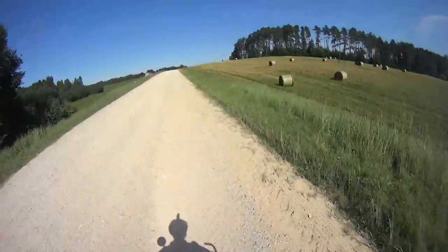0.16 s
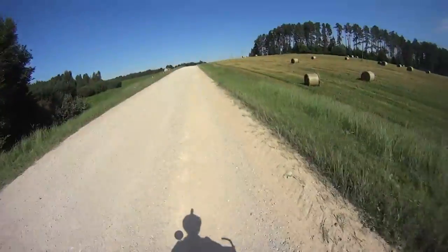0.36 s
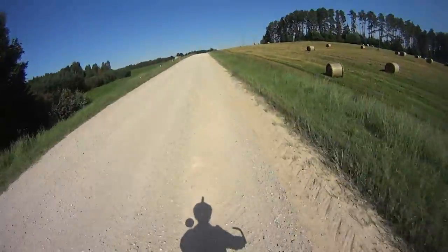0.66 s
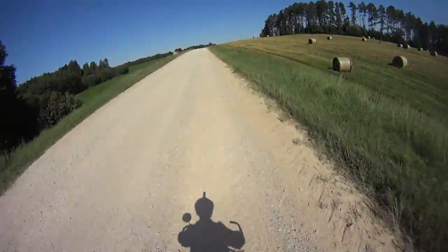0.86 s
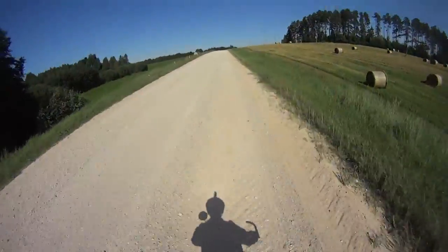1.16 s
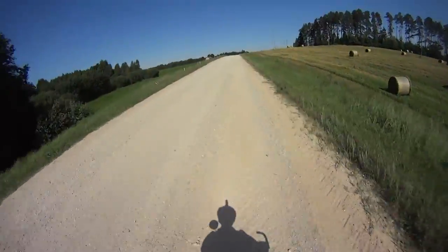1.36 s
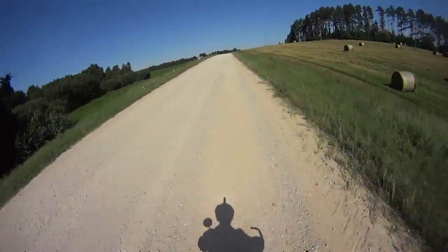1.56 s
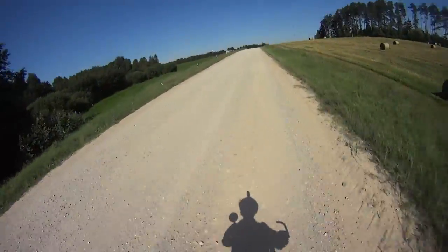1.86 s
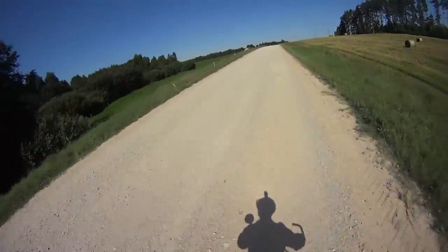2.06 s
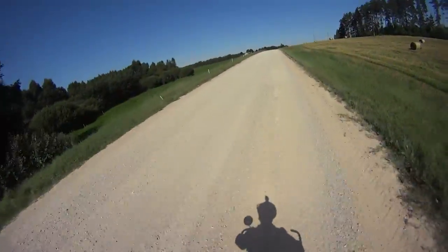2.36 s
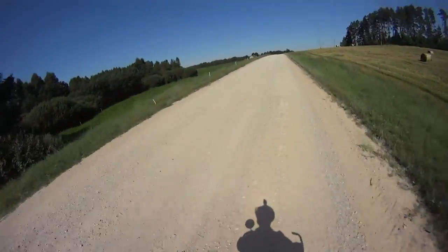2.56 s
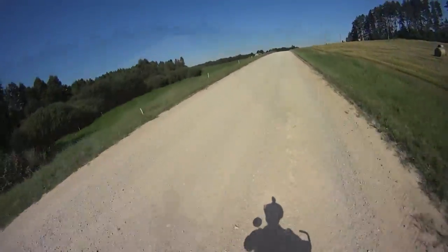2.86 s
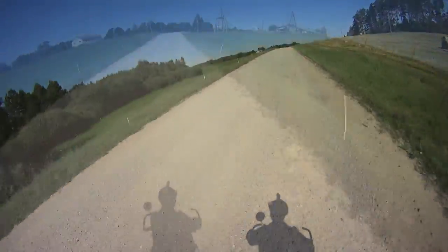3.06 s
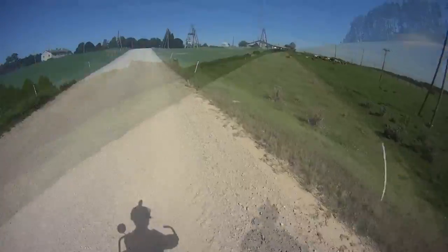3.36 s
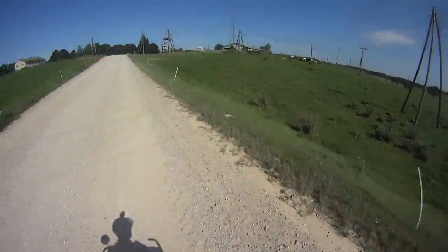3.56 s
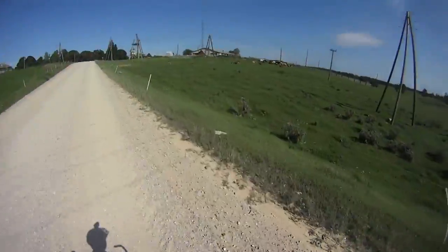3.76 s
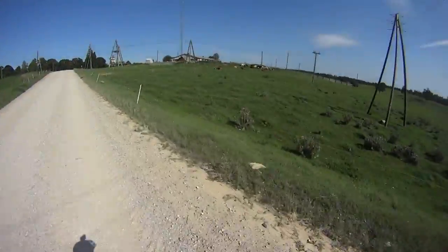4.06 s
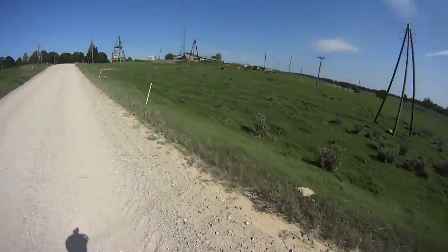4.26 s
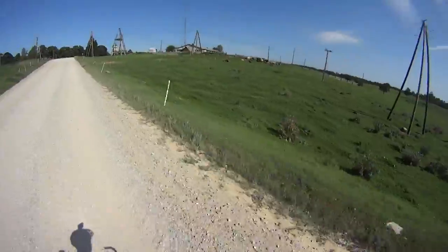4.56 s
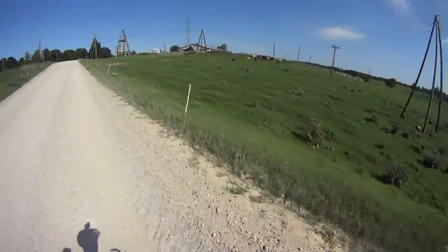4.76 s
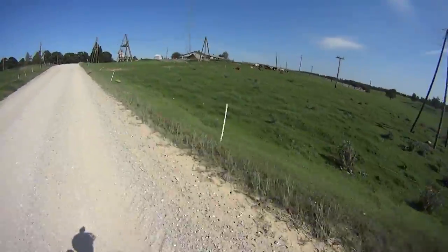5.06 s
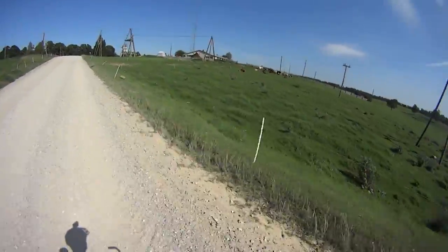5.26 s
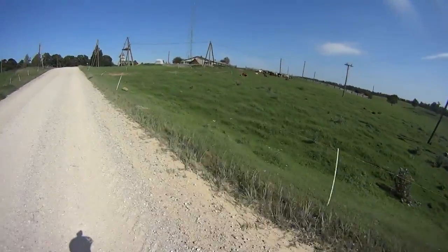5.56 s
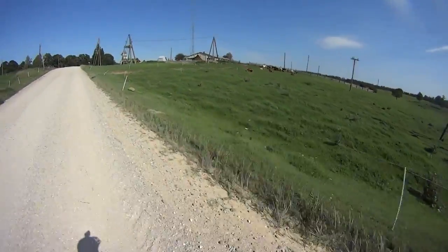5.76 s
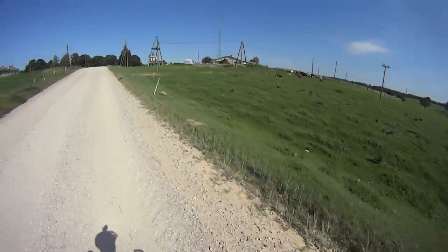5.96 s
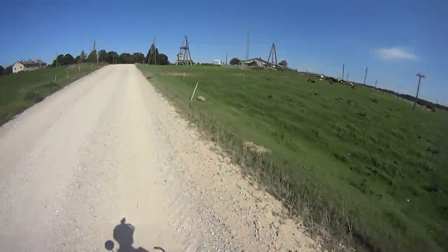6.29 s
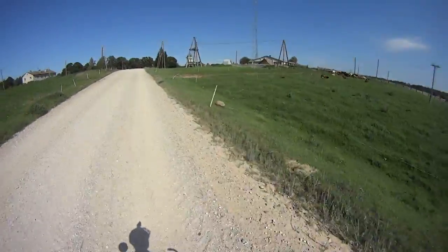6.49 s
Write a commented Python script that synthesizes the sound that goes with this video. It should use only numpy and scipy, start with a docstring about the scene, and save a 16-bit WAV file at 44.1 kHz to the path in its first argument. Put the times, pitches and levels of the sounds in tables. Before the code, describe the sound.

Bicycle tyres roll over a loose gravel road with a continuous crunch and gritty hiss. Stones snap sharply under the wheels, and the frame drones and rumbles, with small knocks and thumps early on. About halfway, something briefly scrapes the microphone housing amid a louder crunch and a bump. The gravel then sounds coarser, with more frequent stone pops. The microphone rides along in a closed case.

```python
"""A loose gravel road under a rolling bicycle, heard by a small stereo camera in a closed housing.
Stones crunch and snap under the tyres and ring in the housing near 2 kHz; grit hisses above
and shoots against it. The road drones and rumbles through the frame, bumps thump and knock
the mount, and something scuffs the housing. The gravel turns from fine to coarse midway."""
import sys
import numpy as np
from scipy import signal
from scipy.fft import rfft, irfft, next_fast_len
from scipy.io import wavfile

SR = 44100
rng = np.random.default_rng(int(sys.argv[2]) if len(sys.argv) > 2 else 0)


def to_wav(sig):
    """Store sig (one row per channel, or 1-D mono) as 16-bit WAV at the path in sys.argv[1].

    Samples outside -1..1 are clipped; the rate is SR.
    """
    pcm = np.clip(np.atleast_2d(sig), -1, 1) * 32767
    pcm = np.round(pcm).astype(np.int16)
    wavfile.write(sys.argv[1], SR, pcm.T)  # frames by channels


N = 292383
OPPOSED = np.array([[1], [-1]])  # left, right polarity

# gravel under the tyres: time_s, crunch_db, grit_db
GRAVEL_LEVELS = [(0.0,-32,-45), (0.35,-34,-44), (0.81,-36.5,-44.5), (1.2,-34,-41.5), (1.51,-32,-40),
                 (1.76,-32,-39.5), (1.98,-37.5,-45), (2.6,-38,-47), (2.95,-37,-46.5), (3.13,-36,-46),
                 (3.3,-26,-46), (3.46,-33,-44.5), (3.62,-32,-43), (3.86,-33,-44), (4.3,-35.5,-45),
                 (4.61,-33,-45), (5.02,-33,-44.5), (5.4,-36.5,-46.5), (6.0,-36,-45), (6.26,-32.5,-45),
                 (6.63,-34,-45.5)]
# frame shaking: time_s, drone_db, rumble_db
FRAME_LEVELS = [(0.0,-41.5,-41), (0.33,-40,-40), (0.81,-44.5,-50), (1.16,-40.5,-41), (1.44,-38.5,-42.5),
                (2.08,-45.5,-45.5), (2.69,-47.5,-45), (3.08,-44,-41), (3.27,-37,-40), (3.45,-47,-41.5),
                (4.17,-46,-41.5), (4.56,-50,-42.5), (5.04,-42,-42.5), (5.54,-49.5,-47.5), (5.89,-42,-40),
                (6.15,-48,-43.5), (6.63,-46.5,-41.5)]


def crunch(level_db, pressure):
    """Stones grind under the tyres, swelling with pressure; the housing rings near 2 kHz."""
    # crunch spectrum: freq_hz, gain_db
    spectrum = [(900, -38.5), (1400, -13), (1750, -6), (2050, -1), (2300, -6), (2700, -11), (3500, -19.5),
                (5000, -63.5)]
    drive = grains(per_s=900, spread_db=3.0, smooth=1.15, swell=1 + 0.42 * pressure)
    return layer(level_db, drive, spectrum)


def stones():
    """Each snap is a broad crack that rings a few cycles in the housing and crumbles."""
    # loud snaps: start_s, level_db, pitch_hz, crack_re_ring_db
    loud = [(0.0812, -18, 1890, -8), (0.1135, -10.5, 2180, -11), (0.156, -10, 2000, -11),
            (0.1845, -18, 1550, -10), (0.2752, -13.5, 1590, -13), (0.3703, -19, 1550, -9),
            (0.6414, -18, 1990, -18), (0.7601, -18, 2110, -9), (0.8415, -17.5, 2200, -15),
            (0.8779, -16, 1960, -16), (1.056, -11, 1970, -19), (1.173, -15, 1550, -10),
            (1.2116, -14, 2140, -8), (1.2915, -17, 1940, -11), (1.3319, -23, 1950, -8),
            (1.4079, -15, 2380, -9), (1.4244, -16, 1630, -17), (1.5238, -16, 1610, -11),
            (1.5723, -17.5, 2170, -18), (1.9669, -17, 2030, -12), (2.3239, -13.5, 2250, -19),
            (2.3828, -13.5, 2000, -13), (2.885, -16, 2200, -11), (3.1914, -14, 2080, -15),
            (3.2099, -12, 2020, -14), (3.5214, -18, 1850, -11), (3.5339, -14, 2060, -19),
            (3.5793, -14, 2010, -19), (3.646, -12.5, 2170, -12), (3.7386, -10, 2060, -19),
            (3.7948, -13, 2030, -13), (3.8069, -6.5, 2120, -23), (3.864, -13, 1950, -17),
            (3.8784, -6.5, 1990, -21), (3.9666, -14.5, 2050, -23), (4.035, -17.5, 1960, -18),
            (4.1866, -14.5, 1970, -14), (4.315, -10.5, 1970, -23), (4.3224, -11, 2040, -15),
            (4.3284, -12, 2350, -14), (4.4992, -17, 2160, -20), (4.558, -14, 1980, -19),
            (4.594, -13, 2110, -27), (4.7086, -15.5, 2100, -16), (4.8871, -11, 2040, -14),
            (4.907, -6, 2070, -20), (4.9776, -17, 2250, -16), (5.0125, -14, 2090, -18),
            (5.065, -10.5, 2030, -18), (5.0928, -17, 2060, -11), (5.1291, -13.5, 2090, -20),
            (5.1509, -10, 1870, -21), (5.1634, -15, 1900, -15), (5.2602, -15, 2000, -14),
            (5.3956, -15, 2020, -18), (5.4131, -10.5, 2100, -22), (5.4455, -21, 2010, -11),
            (5.5084, -16, 2050, -18), (5.6144, -14, 2160, -16), (5.6747, -13.5, 2100, -22),
            (6.0768, -15, 2200, -20), (6.352, -13, 2100, -11), (6.4512, -19.5, 2900, -6),
            (6.5754, -13, 2100, -9), (6.5849, -8, 2030, -14)]
    count = 24
    starts_s = rng.random(count) * N / SR
    levels_db = rng.normal(-22, 2, count)
    pitches_hz = rng.normal(2050, 120, count)
    small = [(*row, -15) for row in zip(starts_s, levels_db, pitches_hz)]
    out = np.zeros((2, N))
    for start_s, level_db, pitch_hz, crack_db in small + list(loud):
        pan_db = rng.normal(0.4, 1.5)
        noise = rng.standard_normal(1200)
        ring = burst(pitch_hz, rise_s=0.00048, t60_s=0.006)[:len(noise)]
        crack = peak_one(bandpass(decay(noise, t60_s=0.0062), 2500, 4800))
        crumble = bandpass(decay(noise, t60_s=0.051), 1800, 2350, order=1)
        snap = ring + amp(crack_db) * crack + amp(-8.5) * crumble
        add(out, start_s, amp(level_db + OPPOSED * pan_db / 2) * snap)
    return out


def crackle(drone_db, pressure):
    """Gravel crackles, a little softer once coarse, and swings with the shaking of the frame."""
    # crackle spectrum: freq_hz, gain_db
    spectrum = [(900, -19.5), (1300, -15), (1900, -5), (2500, 1.5), (3300, -4.5), (4200, -11.5),
                (5500, -26.5), (8000, -72.5)]
    fine_db, coarse_db = -37.5, -40
    change_at_s, change_s = 3.44, 0.13
    coarseness = np.clip((np.arange(N) / SR - change_at_s) / change_s + .5, 0, 1)
    shake_db = 0.3 * (drone_db - drone_db.mean())
    level_db = fine_db + (coarse_db - fine_db) * coarseness + shake_db
    drive = grains(per_s=2000, spread_db=4.1, smooth=0.8, swell=1 + 0.34 * pressure)
    return layer(level_db, drive, spectrum)


def grit(level_db, pressure):
    """Coarse and fine grit slip at moments of their own, hissing below and above a split."""
    # grit spectrum: freq_hz, gain_db
    spectrum = [(2060, -19.5), (3500, -6), (4530, -4), (5320, -0.5), (6110, -10), (7460, -10),
                (9100, -21.5), (10600, -11.5), (11200, -24.5), (11500, -66), (15000, -53), (22000, -120)]
    split_hz = 6300
    low, high = [signal.butter(3, split_hz, kind, fs=SR, output="sos") for kind in ("low", "high")]
    coarse_swell = 1 + 0.22 * pressure + 0.24 * crumbling(per_s=54, fade_s=0.0084)
    coarse = grains(per_s=2000, spread_db=3.3, smooth=1.16, swell=coarse_swell)
    fine_swell = 1 + 0.25 * pressure + 0.29 * crumbling(per_s=60, fade_s=0.007)
    fine = grains(per_s=2000, spread_db=3.3, smooth=1.33, swell=fine_swell)
    drive = signal.sosfilt(low, rms_one(coarse)) + signal.sosfilt(high, rms_one(fine))
    return layer(level_db, drive, spectrum)


def ticks():
    """Grit shot against the housing: dry cracks that reach into its two top resonances."""
    # loud shots: start_s, peak_db, top_re_body_db
    loud = [(0.0807, -33, -16), (0.184, -21, -25), (0.2748, -22, -22), (0.3696, -25, -17),
            (0.76, -24.5, -15), (0.8734, -29, -14), (1.1722, -19, -19), (1.1947, -23, -11),
            (1.212, -17, -15), (1.3458, -14.5, -20), (1.4084, -18, -26), (1.56, -14, -9),
            (1.6935, -20, -22), (1.7595, -16, -23), (2.9935, -28, -25), (3.256, -28, -15),
            (3.6451, -24, -18), (4.313, -25, -23), (4.8998, -23, -15), (5.1632, -24, -21),
            (5.2597, -23.5, -17), (5.2834, -25, -15), (5.7413, -28, -22), (6.2961, -20, -14),
            (6.4502, -23, -24), (6.5844, -31, -19)]
    count, over_grit_db = 70, 15
    time_s, _, grit_db = np.transpose(GRAVEL_LEVELS)
    starts_s = rng.random(count) * N / SR
    peaks_db = np.interp(starts_s, time_s, grit_db) + rng.normal(over_grit_db, 3, count)
    small = [(*row, -16) for row in zip(starts_s, peaks_db)]
    out = np.zeros((2, N))
    for start_s, peak_db, top_db in small + list(loud):
        mid, side = rng.standard_normal((2, 900))
        impact = decay(mid + 0.32 * side * OPPOSED, t60_s=0.015)
        body = bandpass(impact, 3200, 5970)
        top = bandpass(impact, 6300, 7400) + 0.64 * bandpass(impact, 9700, 9800)
        add(out, start_s, amp(peak_db) * peak_one(body + amp(top_db) * top))
    return out


def knocks():
    """The mount rings in three modes over a dry rattle; one mode rocks the ports oppositely."""
    # mount knocks: start_s, level_db, pitch_hz, upper_modes_db
    hits = [(0.081, -26.5, 740, -2), (0.185, -23, 740, -4), (0.234, -21.5, 1030, -1.5),
            (0.275, -24, 757, -0.5), (0.37, -27.5, 720, -0.5), (0.464, -30, 730, 2),
            (1.011, -25.5, 755, -1), (1.057, -26, 1190, -4), (1.081, -24.5, 785, -2),
            (1.172, -25.5, 733, 2), (1.226, -26, 665, 3), (1.424, -24.5, 980, 0), (1.523, -24, 950, 3.5),
            (1.581, -25.5, 940, -5), (1.86, -29.5, 665, 1.5), (2.24, -30, 646, -1), (2.35, -33, 650, -3),
            (3.061, -27.5, 680, -7), (3.132, -29, 1180, -8), (3.272, -17.5, 1180, -15),
            (4.313, -30, 1124, 3)]
    out = np.zeros((2, N))
    for start_s, level_db, pitch_hz, upper_db in hits:
        ring = burst(pitch_hz, rise_s=0.00014, t60_s=0.036)
        ring += amp(upper_db) * burst(1554, rise_s=0.00047, t60_s=0.033)
        rocking = 0.66 * amp(upper_db) * burst(1310, rise_s=0.00072, t60_s=0.038)
        noise = rng.standard_normal((2, len(ring)))
        rattle = amp(0.5) * peak_one(bandpass(decay(noise, t60_s=0.04), 350, 1500))
        add(out, start_s, amp(level_db) * (ring * [[1.3], [.7]] + rocking * OPPOSED + rattle))
    return out


def bumps():
    """The frame thumps low, with a dull thud and a rattle out of step at the two ports."""
    # road bumps: start_s, thump_db, pitch_hz, thud_db
    hits = [(0.233, -25, 56.5, -23.5), (0.249, -16, 93, -30), (0.309, -20, 80.7, -31.5),
            (1.009, -28, 100, -38), (1.076, -35, 56.5, -38), (1.201, -27, 60, -33), (1.227, -30, 200, -36),
            (1.238, -23, 70, -27), (3.017, -28, 72, -33.5), (3.197, -29.5, 132, -39),
            (3.263, -21, 109, -25.5), (3.643, -36, 102, -33.5), (4.188, -39, 132, -36),
            (5.621, -31.5, 91.5, -36), (5.755, -30.5, 86, -36.5), (5.994, -30, 75, -46),
            (6.081, -35.5, 160, -32), (6.464, -29, 78, -48), (6.598, -38, 41, -32)]
    out = np.zeros((2, N))
    for start_s, thump_db, pitch_hz, thud_db in hits:
        thump = burst(pitch_hz, rise_s=0.0012, t60_s=0.086)
        left = burst(256, 0.0013, 0.032) + burst(434, 0.0027, 0.043)
        right = burst(250, 0.0018, 0.034) - burst(590, 0.0004, 0.015)
        noise = rng.standard_normal(len(thump))
        rattle = peak_one(bandpass(decay(noise, t60_s=0.073), 110, 700))
        thud = np.array([left, right]) + 1.7 * rattle * OPPOSED
        add(out, start_s, amp(thump_db) * thump + amp(thud_db) * thud)
    return out


def scuffs():
    """Something scrapes across the housing, reaching the two ports nearly opposed."""
    # scrapes: full_level_at_s, hold_s, level_db
    strokes = [(3.133, .015, -21), (3.195, .19, -22), (4.312, .02, -22)]
    # scrape spectrum: freq_hz, gain_db
    spectrum = [(530, -46), (900, -14), (982, -17), (1050, -32), (1180, -10), (1630, -10), (2320, 1),
                (3040, -14), (4000, -31), (5200, -52), (8800, -120)]
    rise_db_per_s, fall_db_per_s = 900, 190
    t = np.arange(N) / SR
    envelopes_db = [level_db - rise_db_per_s * np.maximum(at_s - t, 0)
                    - fall_db_per_s * np.maximum(t - at_s - hold_s, 0)
                    for at_s, hold_s, level_db in strokes]
    swell = 1 + 0.52 * crumbling(per_s=90, fade_s=0.0045)
    drive = grains(per_s=2500, spread_db=1.5, smooth=2.1, swell=swell)
    left, right = layer(np.max(envelopes_db, axis=0), drive, spectrum)
    return np.array([0.45 * left, 0.6 * right - 1.85 * left])


def drone(level_db):
    """The road shakes the frame into a fluttering midrange drone."""
    # drone spectrum: freq_hz, gain_db
    spectrum = [(94, -28), (160, -9), (188, -7), (263, -2.5), (424, -5.5), (511, -3.5), (605, -10),
                (750, -1.5), (832, -5.5), (1000, -0.5), (1280, -11), (1500, -18), (1950, -34), (3300, -120)]
    drive = grains(per_s=400, spread_db=4.3, smooth=2.8, swell=amp(2.1 * drift(rate_hz=21.5)))
    return layer(level_db, drive, spectrum)


def rumble(level_db):
    """The road rumbles through the frame, mostly below 200 Hz."""
    # rumble spectrum: freq_hz, gain_db
    spectrum = [(12, -17), (20, 2.5), (53, -2.5), (92, 1.5), (132, -2.5), (171, -11.5), (200, -22),
                (260, -25), (440, -120)]
    drive = grains(per_s=100, spread_db=2.4, smooth=9.9, swell=amp(0.32 * drift(rate_hz=10)))
    return layer(level_db, drive, spectrum)


def crumbling(per_s, fade_s):
    """Contact pressure: sudden slips that each die away; mean 1."""
    slips = np.minimum(rng.exponential(1, N), 2.2) * (rng.random(N) < per_s / SR)
    pressure = signal.lfilter([1], [1, -np.exp(-1 / (fade_s * SR))], slips)
    return pressure / pressure.mean()


def grains(per_s, spread_db, smooth, swell):
    """Uneven clicks over smooth noise; mid and side drives share the moments of contact."""
    sizes = amp(spread_db * np.minimum(rng.exponential(1, N), 4))
    contacts = rng.random(N) < per_s / SR
    clicks = rms_one(sizes * contacts * rng.standard_normal((2, N)))
    return (clicks + smooth * rng.standard_normal((2, N))) * swell


def layer(level_db, drive, spectrum):
    """Colour mid and side drives, spread them over the two ports and apply a level curve."""
    # left-right likeness: freq_hz, coherence
    port_coherence = [(40, 0.98), (70, 1), (130, 0.87), (250, 0.77), (500, 0.58), (1000, 0.75),
                      (2000, 0.91), (4500, 0.91), (8000, 0.83), (11000, 0.99)]
    # left ahead of right: freq_hz, phase_rad
    port_lead = [(0, -0.5), (430, 2.5), (780, 1.26), (1030, 1.3), (2150, -0.14), (2500, 0.5), (4390, 0.04),
                 (7150, 0.5), (8180, 0.67), (12000, 0.7)]
    size = next_fast_len(N + SR // 4)
    hz = np.maximum(np.arange(size // 2 + 1) * SR / size, 1)
    cepstrum = irfft(np.log(amp(np.maximum(at_hz(spectrum, hz), -70))), size)
    cepstrum[1:size // 2] *= 2  # minimum phase: ringing follows each click
    cepstrum[size // 2 + 1:] = 0
    mid, side = rfft(drive, size) * np.exp(rfft(cepstrum))
    coherence = np.clip(at_hz(port_coherence, hz), 0, .99)
    spread = mid * np.sqrt(1 + coherence) + side * np.sqrt(1 - coherence) * OPPOSED
    lead_rad = np.interp(hz, *np.transpose(port_lead))
    ports = irfft(spread * np.exp(.5j * lead_rad * OPPOSED), size)[:, :N]
    return amp(level_db) * ports / np.std(ports.mean(0))


def burst(pitch_hz, rise_s, t60_s):
    """A struck mode that swells briefly and dies; peak 1."""
    t = np.arange(int(SR * .15)) / SR
    attack = (1 - np.exp(-t / rise_s)) ** 2
    return peak_one(decay(attack * np.sin(2 * np.pi * pitch_hz * t), t60_s))


def drift(rate_hz):
    """Slow random wander; rms 1."""
    pole = np.exp(-2 * np.pi * rate_hz / SR)
    return rms_one(signal.lfilter([1], [1, -2 * pole, pole * pole], rng.standard_normal(N + SR))[SR:])


def decay(x, t60_s):
    return x * amp(-60 * np.arange(x.shape[-1]) / SR / t60_s)


def bandpass(x, low_hz, high_hz, order=2):
    return signal.sosfilt(signal.butter(order, [low_hz, high_hz], "band", fs=SR, output="sos"), x)


def amp(db):
    return 10 ** (np.asarray(db) / 20)


def rms_one(x):
    return x / np.sqrt(np.mean(x ** 2) + 1e-20)


def peak_one(x):
    return x / np.abs(x).max()


def at_hz(points, hz):
    """Read a table on a log-frequency axis."""
    freq_hz, values = np.transpose(points)
    return np.interp(np.log(hz), np.log(freq_hz + 1e-9), values)


def in_time(rows):
    """Columns of a time curve, per sample."""
    time_s, *columns = np.transpose(rows)
    return [np.interp(np.arange(N) / SR, time_s, column) for column in columns]


def add(out, start_s, wave):
    start = round(start_s * SR)
    out[:, start:start + wave.shape[1]] += wave[:, :N - start]


def scene():
    """Three gravel layers on one shared pressure, two frame layers, scuffs and single blows."""
    crunch_db, grit_db = in_time(GRAVEL_LEVELS)
    drone_db, rumble_db = in_time(FRAME_LEVELS)
    pressure = crumbling(per_s=70, fade_s=0.0068)
    gravel = crunch(crunch_db, pressure) + crackle(drone_db, pressure) + grit(grit_db, pressure)
    frame = drone(drone_db) + rumble(rumble_db)
    return gravel + frame + scuffs() + stones() + ticks() + knocks() + bumps()


def record(dry):
    """The two ports differ in sensitivity with pitch; peaks are rounded and the top is cut."""
    # port imbalance: freq_hz, left_minus_right_db
    imbalance = [(60, 3.5), (110, -1.5), (190, 3.5), (350, 0.5), (630, 2.0), (1130, 5), (2020, 1.5),
                 (3640, 2), (6540, 1.0), (11800, -0.5)]
    ceiling, stopband_hz = 0.7, 12100
    size = next_fast_len(N + 4096)
    hz = np.maximum(np.arange(size // 2 + 1) * SR / size, 1)
    ports = irfft(rfft(dry, size) * amp(at_hz(imbalance, hz) * OPPOSED / 2), size)[:, :N]
    rounded = ceiling * np.tanh(ports / ceiling)
    return signal.sosfilt(signal.cheby2(12, 50, stopband_hz, fs=SR, output="sos"), rounded)


dry = scene()
out = record(dry)
to_wav(out)
```